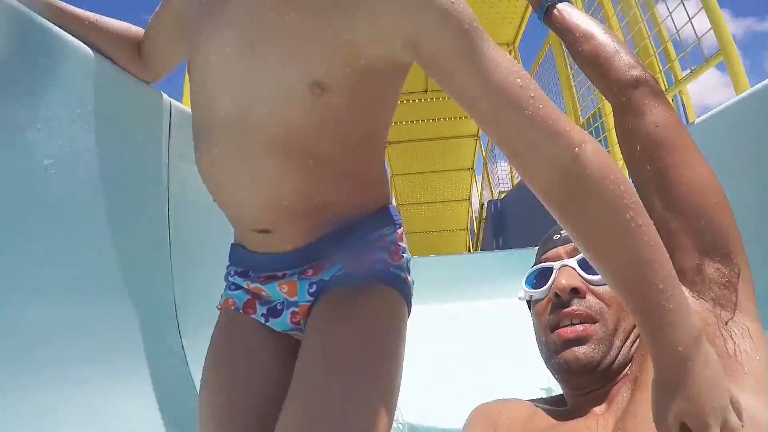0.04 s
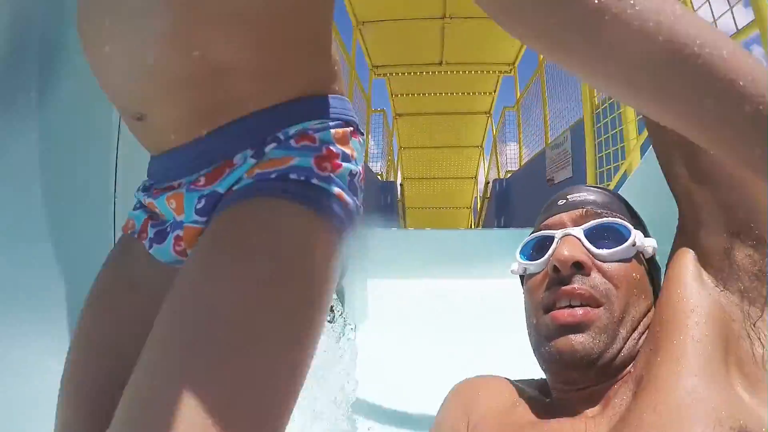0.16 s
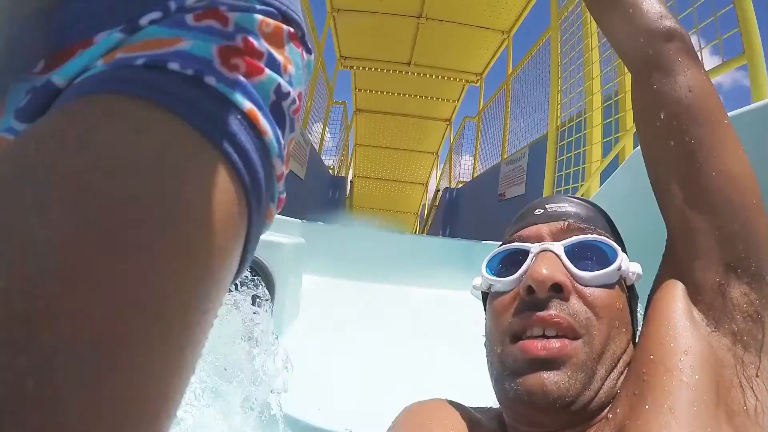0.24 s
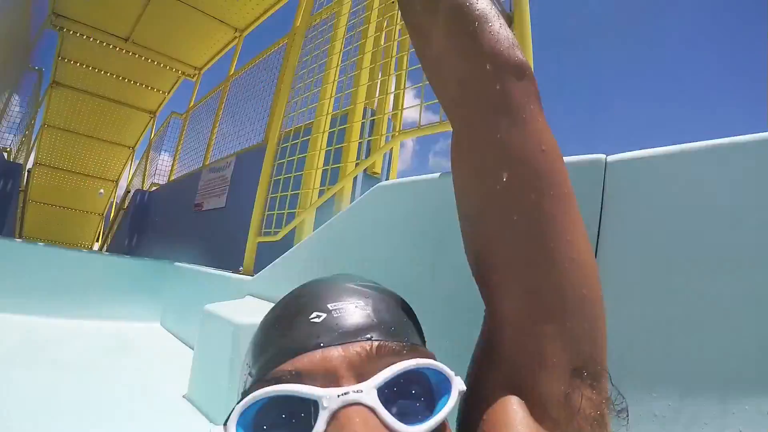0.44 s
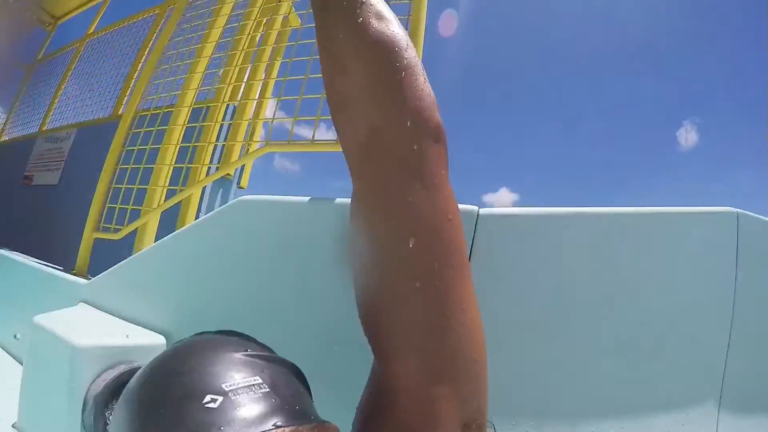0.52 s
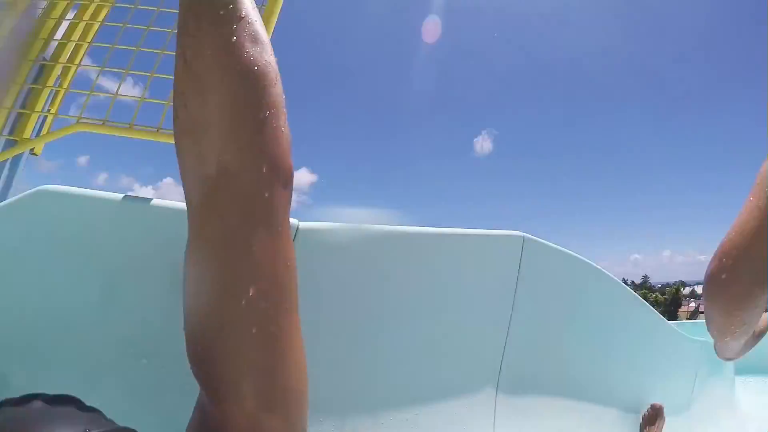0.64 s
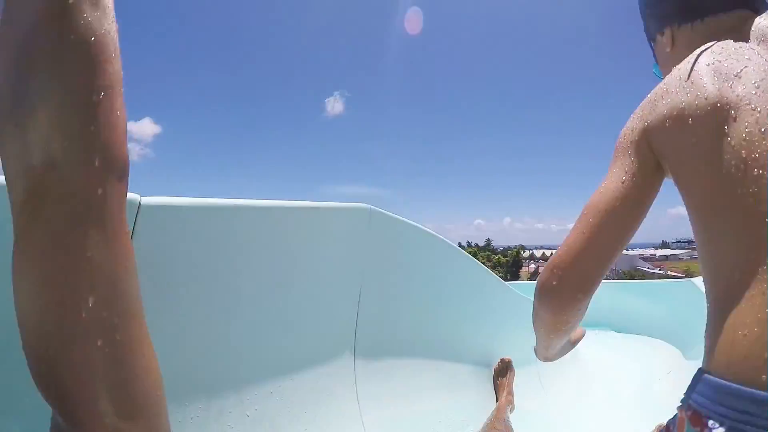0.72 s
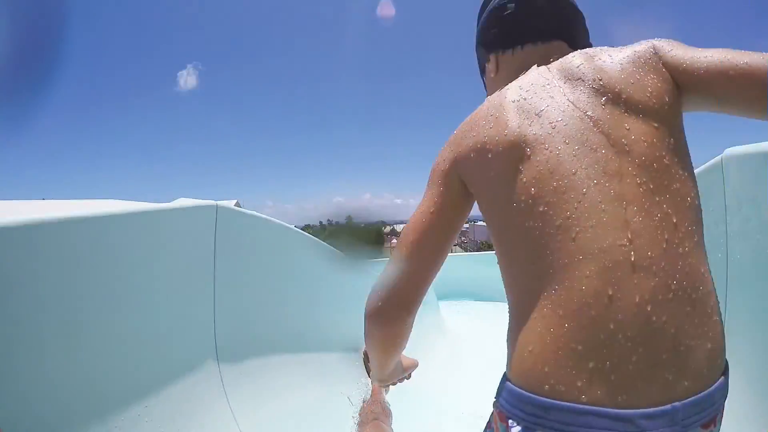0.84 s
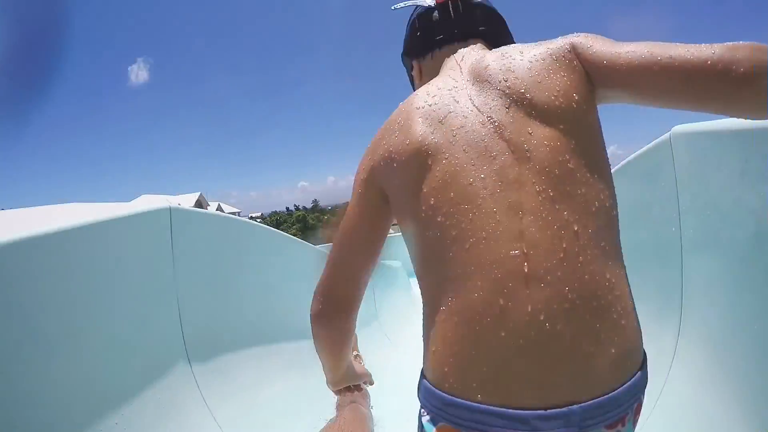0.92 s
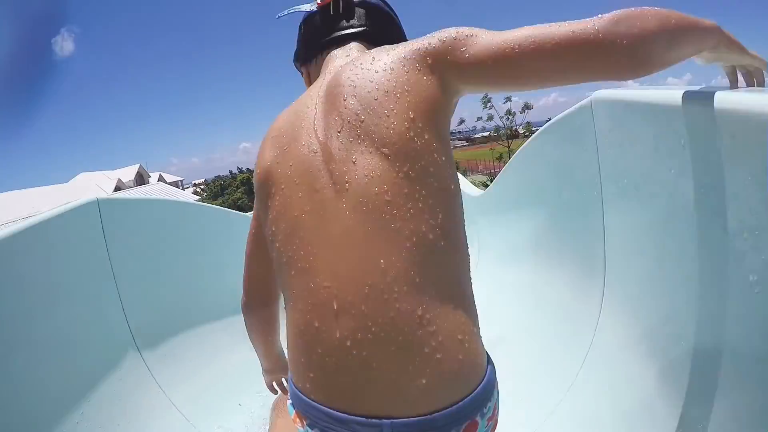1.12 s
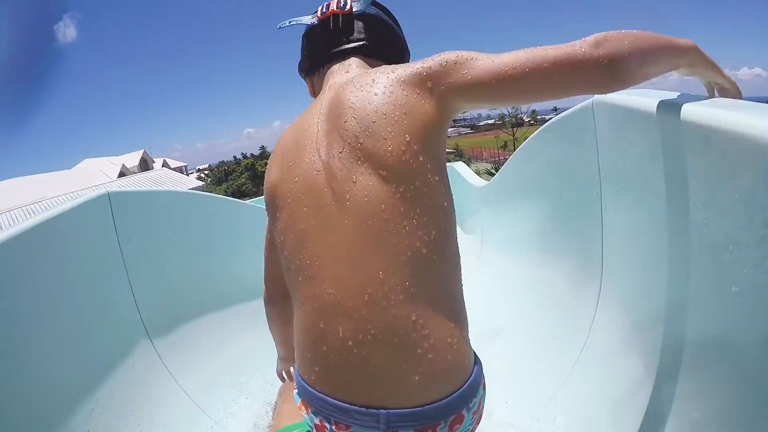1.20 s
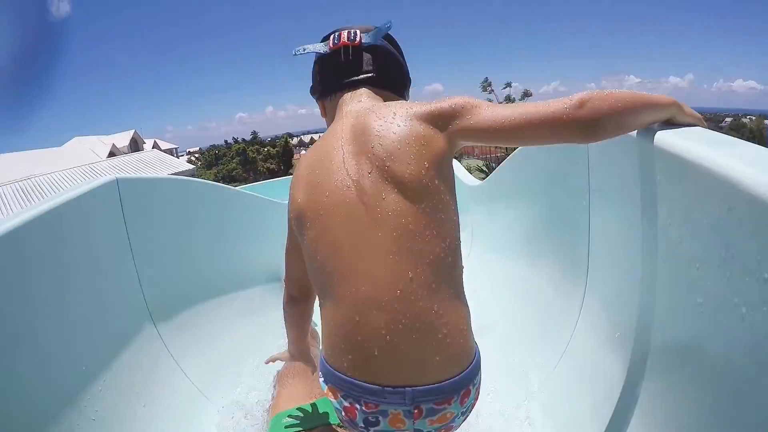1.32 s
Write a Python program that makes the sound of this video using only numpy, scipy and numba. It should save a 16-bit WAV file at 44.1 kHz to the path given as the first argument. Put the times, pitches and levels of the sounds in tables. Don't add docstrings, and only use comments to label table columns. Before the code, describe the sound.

Bubbling water stream on a water slide, bright splashes and plops, plus an early dull bump

```python
import sys
import numpy as np
from scipy import signal
from scipy.fft import rfft, irfft
from scipy.io import wavfile
from scipy.ndimage import uniform_filter1d
from numba import njit

SR = 44100
rng = np.random.default_rng(int(sys.argv[2]) if len(sys.argv) > 2 else 0)


def master(y):
    cut = np.clip(np.atleast_2d(y).T, -1, 1)
    pcm = np.round(cut * 32767)
    wavfile.write(sys.argv[1], SR, pcm.astype(np.int16))


def decibels_to_gain(level_db):
    exponent = np.asarray(level_db, float) / 20
    return 10 ** exponent


N = 59535


def level(x, rms_db):
    return x * decibels_to_gain(rms_db) / np.sqrt(np.mean(x ** 2))


def shape(table, hz):
    table_hz, table_db = np.array(table).T
    return np.interp(np.log(hz), np.log(table_hz), table_db)


def colour(x, db_of):
    hz = np.maximum(np.fft.rfftfreq(N, 1 / SR), 1)
    return irfft(rfft(x) * decibels_to_gain(db_of(hz)), N)


def band(x, hz, width_hz):
    return signal.lfilter(*signal.iirpeak(hz, hz / width_hz, SR), x)


def bell(t, centre_s, length_s, narrowness=2):
    return np.exp(-((t - centre_s) / length_s * narrowness) ** 2)


def walk(rate_hz):
    hold = int(SR / rate_hz)
    steps = np.repeat(rng.standard_normal(N // hold + 1), hold)
    return 0.96 * uniform_filter1d(uniform_filter1d(steps, hold), hold)[:N]


@njit
def grains(at, hz, cycles, size, glide, n):
    out = np.zeros(n)
    for k in range(len(at)):
        life = int(cycles[k] * SR / hz[k])
        phase = 0.
        for i in range(min(5 * life, n - at[k])):
            phase += 2 * np.pi * hz[k] * (1 + glide * i / life) / SR
            envelope = np.exp(-i / life) * min(1.3 * i / life, 1.)
            out[at[k] + i] += size[k] * envelope * np.sin(phase)
    return out


def bubble_size(u, spread_db):
    return decibels_to_gain(spread_db * np.minimum(-np.log(u), 2.1))


def fizz(per_s, lo_hz, hi_hz, cycles, spread_db, glide):
    u = rng.random((int(per_s * N / SR), 4)).T
    at = (u[0] * N).astype(np.int64)
    hz = lo_hz * (hi_hz / lo_hz) ** u[1]
    life = cycles * (.5 + u[2])
    size = bubble_size(u[3], spread_db) * hz / np.sqrt(life)
    return level(grains(at, hz, life, size, glide, N), 0)


def rush(table, bubbles, bubble_db, shared_db, own_db, rate_hz):
    x = colour(rng.standard_normal(N) + decibels_to_gain(bubble_db) * bubbles, lambda f: shape(table, f))
    surge_db = shared_db * walk(rate_hz)
    out = 0
    centres = 100 * 2. ** np.arange(8)
    for centre in centres:
        def octave_db(f):
            octaves_off = abs(np.log2(np.clip(f, centres[0], centres[-1]) / centre))
            return 20 * np.log10(np.clip(1 - octaves_off, 1e-6, 1))
        out = out + colour(x, octave_db) * decibels_to_gain(surge_db + own_db * walk(2 * rate_hz))
    return level(out, 0)


# (time [s], chute stream level [dB], pipe spray level [dB])
FLOW = [(0, -48, -38.5), (.08, -42.5, -41), (.17, -39.5, -39), (.26, -49, -40), (.31, -39.5, -36),
        (.37, -38, -37.5), (.44, -37, -38.5), (.52, -36.5, -39), (.6, -35.5, -38.5), (.68, -33.5, -40),
        (.76, -33, -39), (.84, -37, -39.5), (.92, -33.5, -38.5), (1.03, -37, -38.5), (1.12, -36.5, -40),
        (1.19, -35.5, -38.5), (1.24, -38, -39.5), (1.35, -38, -39.5)]
# (frequency [Hz], density [dB per Hz])
CHUTE_SPECTRUM = [(70, -41), (160, -10), (300, -17.5), (600, -13.5), (1200, -7), (1900, -0.5), (2500, -8),
                  (3500, -42)]
# (time [s], peak [dB], pitch [Hz])
PLOPS = [(0.0059, -27.5, 2510), (0.0123, -31.4, 1800), (0.0203, -26.5, 2350), (0.0322, -29.6, 2020),
         (0.1622, -28.5, 2490), (0.1759, -27.2, 2050), (0.3153, -26.3, 2440), (0.3365, -29.4, 1930),
         (0.3866, -25.6, 1730), (0.4178, -28.8, 2620), (0.4494, -31.4, 1290), (0.4753, -20.6, 1810),
         (0.4832, -26.9, 1800), (0.4989, -22.9, 1640), (0.5216, -26.0, 1730), (0.5295, -23.0, 1940),
         (0.5514, -26.6, 1750), (0.62, -26, 1750), (0.6383, -27.8, 2220), (0.6714, -24.9, 1960),
         (0.6834, -26.1, 2260), (0.6907, -25.0, 2030), (0.7145, -23.3, 1900), (0.7347, -26.4, 1840),
         (0.7619, -32.7, 1330), (0.7924, -26.3, 2120), (0.8007, -23.5, 2030), (0.8082, -26.5, 1400),
         (0.8158, -28.5, 1380), (0.8506, -24.3, 1900), (0.8698, -26.9, 2230), (0.8795, -21, 1450),
         (0.8862, -19.5, 1740), (0.9213, -27.3, 2530), (0.939, -23.4, 2110), (0.959, -25.0, 2120),
         (0.9821, -22.2, 2340), (1.0, -26.3, 2180), (1.0316, -25.9, 2200), (1.0744, -29.1, 1900),
         (1.0889, -27.9, 2150), (1.1279, -22.0, 1740), (1.149, -27.4, 1310), (1.18, -28.5, 1670),
         (1.191, -27.3, 2350), (1.2039, -28.5, 1360), (1.2211, -28.6, 1760), (1.2537, -29.0, 1690),
         (1.3341, -28.5, 2130)]
# (time [s], peak [dB], pitch [Hz])
DRIPS = [(0.0948, -33.5, 4220), (0.122, -28.2, 5160), (0.1438, -31.9, 3450), (0.245, -29.1, 5060),
         (0.2984, -33.2, 2910), (0.3221, -30.8, 4520), (0.3264, -30.5, 3530), (0.333, -30.9, 3740),
         (0.4178, -29.4, 3560), (0.4183, -30.6, 4670), (0.4614, -30.3, 3670), (0.5071, -31.3, 3620),
         (0.5518, -31.5, 3740), (0.6204, -32.1, 3800), (0.788, -31.3, 3780), (0.866, -30.7, 4670),
         (0.9551, -30.3, 3550), (0.9798, -33.1, 3060), (0.9863, -32.1, 4200), (0.9896, -34.5, 2970),
         (1.0042, -29.4, 4620), (1.1154, -31.0, 5460), (1.1409, -30.4, 3030), (1.1503, -28.6, 3480),
         (1.2035, -31.0, 5200), (1.2462, -32.0, 3740), (1.3424, -30.8, 4950)]
# (time [s], peak [dB], pitch [Hz])
GLUGS = [(0.035, -28.2, 1220), (0.1164, -33.4, 1010), (0.3345, -34.6, 850), (0.3494, -30.0, 1050),
         (0.4924, -29.2, 1180), (0.64, -30.1, 1160), (0.7177, -35.3, 810), (0.7374, -37.9, 500),
         (0.7471, -34.5, 810), (0.8195, -30.2, 1000), (0.8787, -27.8, 930), (1.0128, -35.6, 590),
         (1.0493, -33.8, 810), (1.0948, -30.9, 900), (1.1195, -26.8, 1090), (1.123, -35.0, 650),
         (1.2722, -34.2, 820), (1.3166, -30.4, 860), (0.735, -39, 228)]
# (time [s], peak [dB], pitch [Hz])
SLAPS = [
    (.3375, -20, 2600),
    (.3385, -24, 3400),
    (.7503, -12.5, 1810),
    (1.0515, -21.5, 4000),
    (1.2765, -19.5, 3480),
    (1.277, -22, 3950),
]


def chute(t):
    bubbles = fizz(2500, 200., 3500., cycles=5.0, spread_db=1.5, glide=.03)
    stream = rush(CHUTE_SPECTRUM, bubbles, -1.5, shared_db=.4, own_db=.9, rate_hz=23)
    stream = stream + decibels_to_gain(-7.5) * gurgle(t, cycles=4.6, scatter=0.24, spread_db=1.3)
    single = 0
    for table, cycles in ((PLOPS, 4.5), (DRIPS, 6.), (GLUGS + SLAPS, 3.2)):
        s, peak_db, hz = np.array(table).T
        at = (s * SR).astype(np.int64)
        single = single + grains(at, hz, np.full(len(s), cycles), decibels_to_gain(peak_db + 2), .02, N)
    flow_s, stream_db, _ = np.array(FLOW).T
    return stream * decibels_to_gain(np.interp(t, flow_s, stream_db) - 3.0) + single


# (time [s], pitch [Hz])
GURGLE_PITCH = [
    (0, 2300),
    (.25, 2340),
    (.4, 1690),
    (.6, 1950),
    (.85, 1870),
    (.95, 2320),
    (1.04, 2150),
    (1.13, 1814),
    (1.35, 1900),
]


def gurgle(t, cycles, scatter, spread_db):
    u = rng.random((int(500 * N / SR), 4)).T
    at = (u[0] * N).astype(np.int64)
    hz = np.interp(t[at], *np.array(GURGLE_PITCH).T) * (1 + scatter * (2 * u[1] - 1))
    life = cycles * (.5 + u[2])
    return level(grains(at, hz, life, bubble_size(u[3], spread_db), 0.022, N), 0)


# (frequency [Hz], density [dB per Hz])
SPRAY_SPECTRUM = [(300, -6), (1000, -3), (2300, -1), (3600, -2.5), (5000, -7), (7200, -12.5),
                  (10000, -22.5), (15500, -31)]
# (time [s], extra level [dB], centre [Hz], length [s])
SPLASHES = [(0.067, -1, 13500, 0.012), (0.12, 4, 5200, 0.015), (0.159, 5.5, 9000, 0.012),
            (0.23, 5, 7500, 0.028), (0.45, 3.5, 11000, 0.027), (0.533, 6, 7050, 0.013),
            (0.602, 3.5, 6000, 0.017), (0.675, 3.5, 7060, 0.07), (0.341, -1, 3500, .01),
            (0.81, 6, 7900, 0.017), (0.866, 6.5, 7000, 0.0061), (0.943, 5, 7900, 0.012),
            (0.983, 3, 6000, 0.032), (1.01, 4, 8000, 0.01), (1.047, 1, 4200, 0.014),
            (1.1, 2.5, 7950, 0.051), (1.118, 4, 5460, 0.021), (1.205, 4.5, 6000, 0.013),
            (1.334, 5.5, 7000, 0.019)]


def spray(t):
    drops = fizz(6000, 1500., 16000., cycles=3.0, spread_db=3.4, glide=.03)
    hiss = rush(SPRAY_SPECTRUM, drops, -2, shared_db=.5, own_db=1.2, rate_hz=31)
    turn_away_s = .38
    facing = decibels_to_gain(-2) * np.exp(-(t / turn_away_s) ** 2)
    jet = band(hiss, 5200, 650) + 0.89 * band(hiss, 7500, 870) + 1.03 * band(hiss, 2660, 530)
    out = hiss + facing * jet
    for s, extra_db, hz, length_s in SPLASHES:
        out = out + (decibels_to_gain(extra_db) - 1) * bell(t, s, length_s) * band(hiss, hz, 1.02 * hz)
    flow_s, _, spray_db = np.array(FLOW).T
    treble_db = 1.5
    return out * decibels_to_gain(np.interp(t, flow_s, spray_db) + treble_db)


# (time of strongest push [s], size [dB], length [s], direction [+1 or -1])
JOLTS = [(0.0039, -21.6, 0.047, -1), (0.0304, -18.3, 0.014, -1), (0.0455, -28.5, 0.047, -1),
         (0.066, -27, 0.014, 1), (0.085, -29, 0.012, 1), (0.1006, -25.8, 0.018, -1),
         (0.1121, -22.3, 0.014, 1), (0.1342, -24.8, 0.016, 1), (0.1593, -31.7, 0.055, -1),
         (0.178, -27, 0.012, 1), (0.196, -22.3, 0.013, -1), (0.2125, -12.6, 0.032, 1),
         (0.2319, -25.1, 0.012, -1), (0.2764, -1.2, 0.017, 1), (0.2874, -5.5, 0.048, -1),
         (0.3075, -2.7, 0.024, 1), (0.3411, -33.3, 0.027, -1), (0.3798, -20.2, 0.013, 1),
         (0.4078, -15.4, 0.054, 1), (0.4321, -25.7, 0.015, -1), (0.4531, -30.6, 0.012, -1),
         (0.4825, -19.6, 0.024, 1), (0.5196, -20.7, 0.035, 1), (0.5407, -22.2, 0.036, -1),
         (0.5536, -23.1, 0.011, 1), (0.5919, -24.8, 0.027, -1), (0.6093, -11.8, 0.016, 1),
         (0.6163, -16.9, 0.048, -1), (0.6386, -21.2, 0.015, 1), (0.657, -23.1, 0.021, -1),
         (0.6839, -20.7, 0.027, -1), (0.7215, -24.9, 0.016, -1), (0.7341, -23.8, 0.032, 1),
         (0.7933, -24.4, 0.019, -1), (0.8045, -25.8, 0.014, 1), (0.8555, -25.3, 0.015, -1),
         (0.8988, -24.8, 0.02, -1), (0.9271, -30.0, 0.012, -1), (0.9394, -28.5, 0.016, 1),
         (1.0299, -25.9, 0.032, -1), (1.1109, -20.8, 0.037, -1), (1.136, -25.5, 0.033, 1),
         (1.1924, -31.6, 0.033, 1), (1.2064, -26.1, 0.021, -1), (1.2247, -22.6, 0.029, 1),
         (1.2578, -22.4, 0.01, -1), (1.2671, -23.1, 0.013, 1), (1.2981, -29.2, 0.026, 1),
         (1.3231, -29.8, 0.012, 1), (1.3474, -24.5, 0.046, -1)]
# (time [s], level [dB], length [s])
KNOCKS = [
    (0.002, -40, 0.01),
    (0.31, -38, 0.11),
    (.612, -38.5, 0.024),
    (0.19, -46, 0.03),
    (.492, -43, .04),
]


def handling(t):
    push = sum(way * decibels_to_gain(db) * bell(t, s, length_s, 4) for s, db, length_s, way in JOLTS)
    tremor = band(band(band(rng.standard_normal(N), 47, 52), 54, 60), 49, 95)
    swell = decibels_to_gain(1.5 * walk(12) - 6 * t)
    creak = level(band(band(rng.standard_normal(N), 96, 94), 98, 224), 0)
    creak = creak * sum(decibels_to_gain(db) * bell(t, s, length_s) for s, db, length_s in KNOCKS)
    rocking = band(push, 22.3, 21.7)
    return rocking + level(tremor * swell, -46.5) + creak


# (frequency [Hz], width [Hz], gain [dB])
SHELL = [(1590, 76, -4), (2890, 320, -4.5), (4220, 167, -5.5), (5300, 280, 3), (6000, 830, -5),
         (7920, 920, -2.5)]


def housing(x):
    def shell_db(f):
        notches_db = sum(db * np.exp(-((f - hz) / width_hz) ** 2) for hz, width_hz, db in SHELL)
        return notches_db - 40 * (f > 15330)
    return colour(x, shell_db)


def scene():
    t = np.arange(N) / SR
    return (chute(t) + spray(t) + handling(t))[None]


def roll_off(x):
    return signal.sosfilt(signal.butter(12, 15900, fs=SR, output="sos"), x)


def record(dry):
    mix = housing(dry[0])[None]
    return roll_off(mix)


dry = scene()
out = record(dry)
master(out)
```